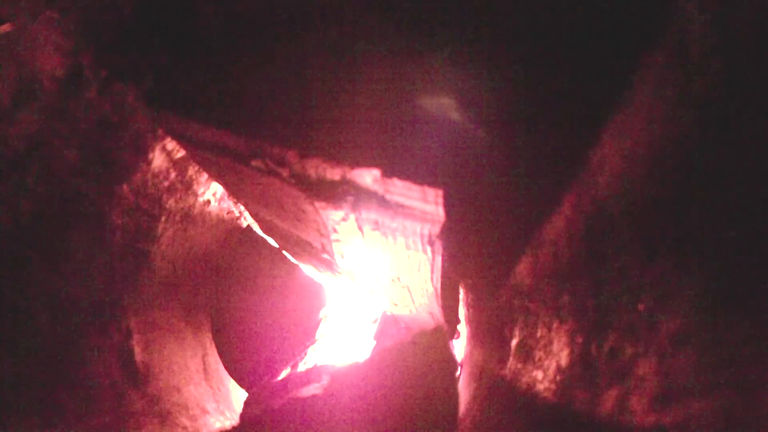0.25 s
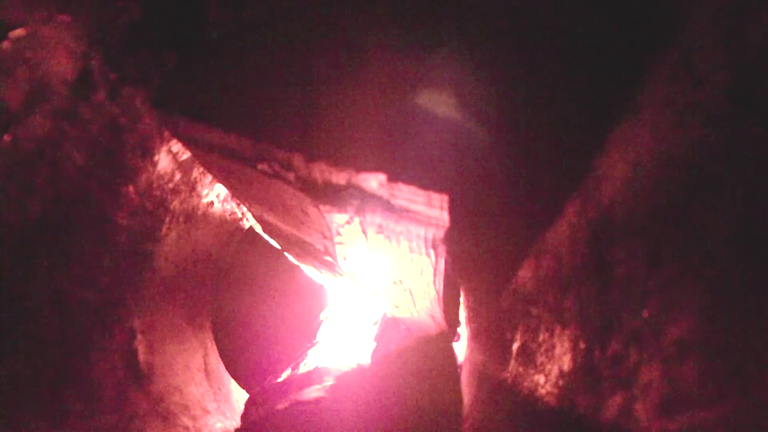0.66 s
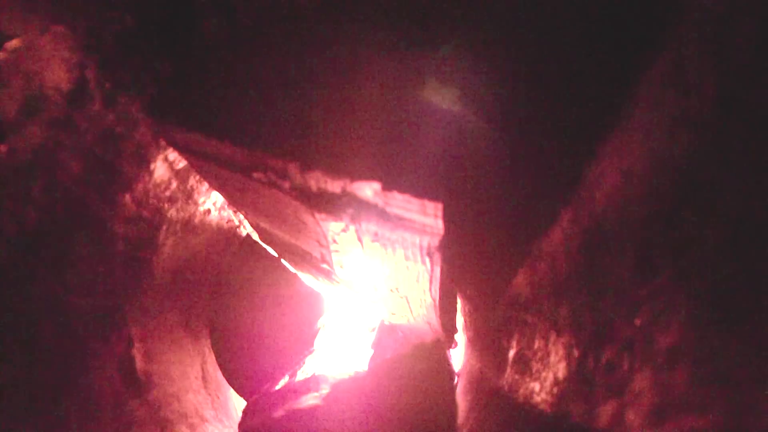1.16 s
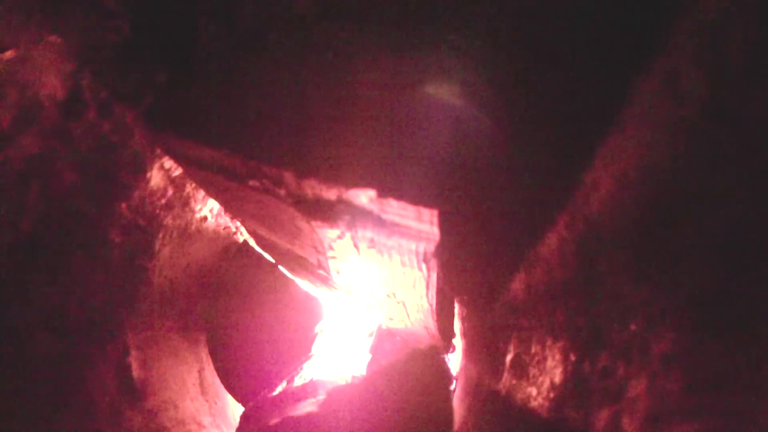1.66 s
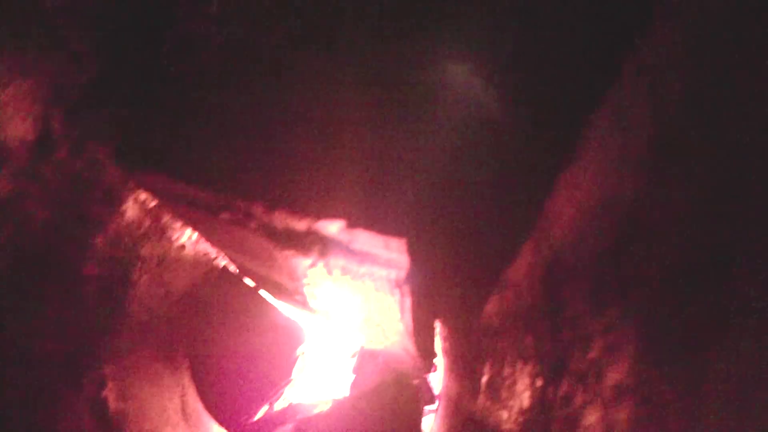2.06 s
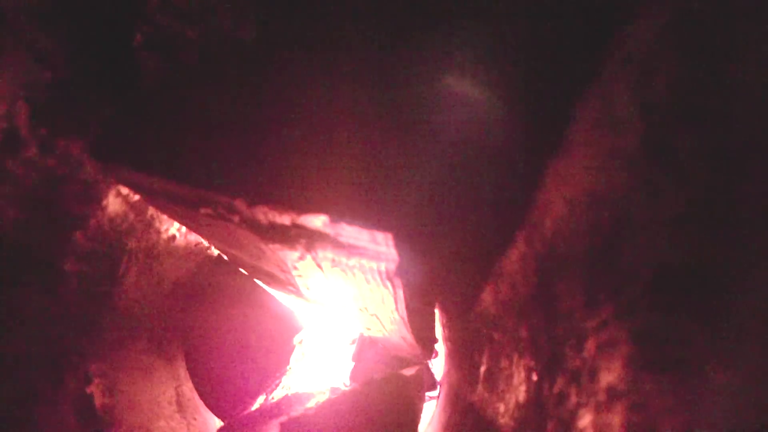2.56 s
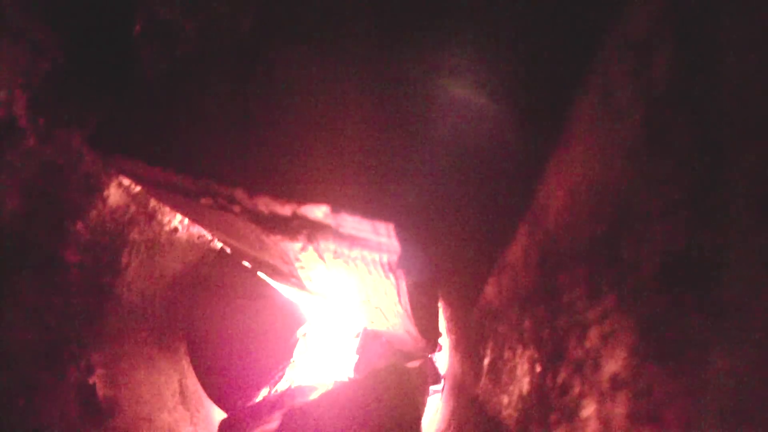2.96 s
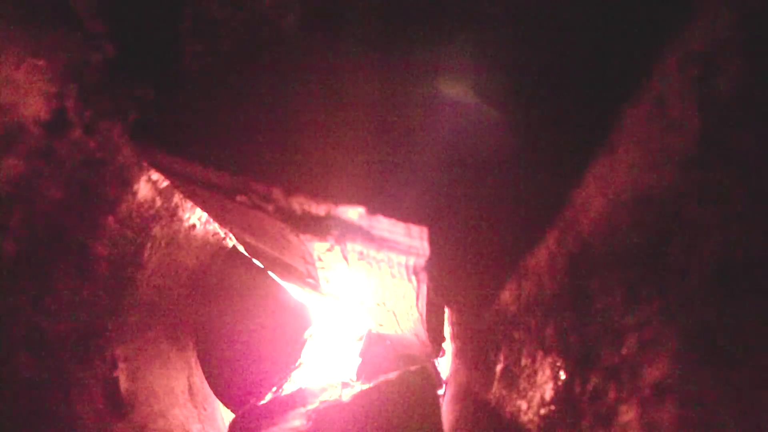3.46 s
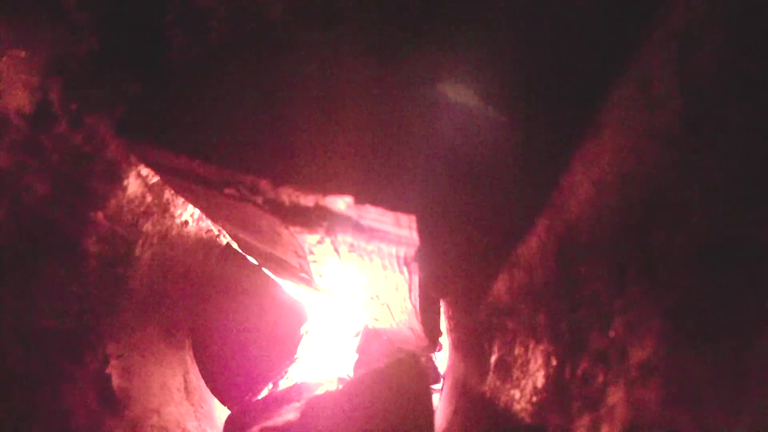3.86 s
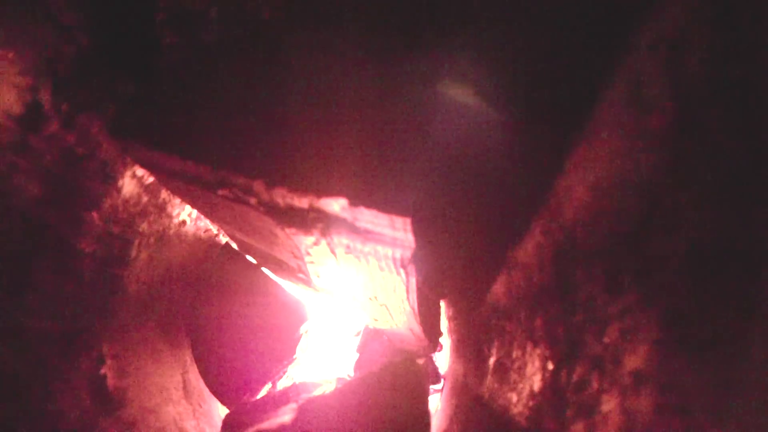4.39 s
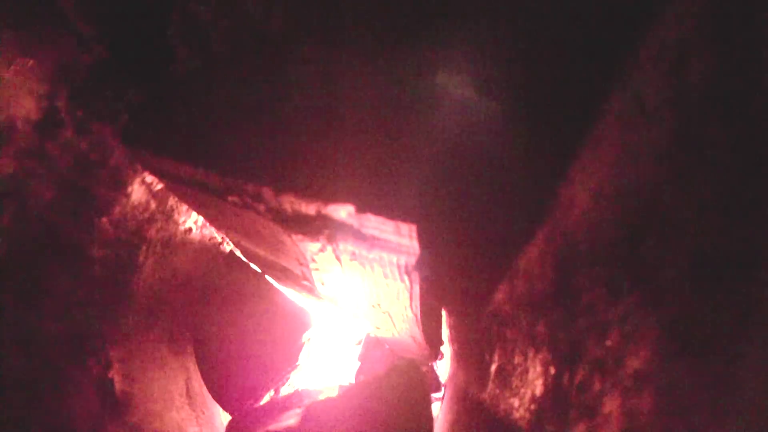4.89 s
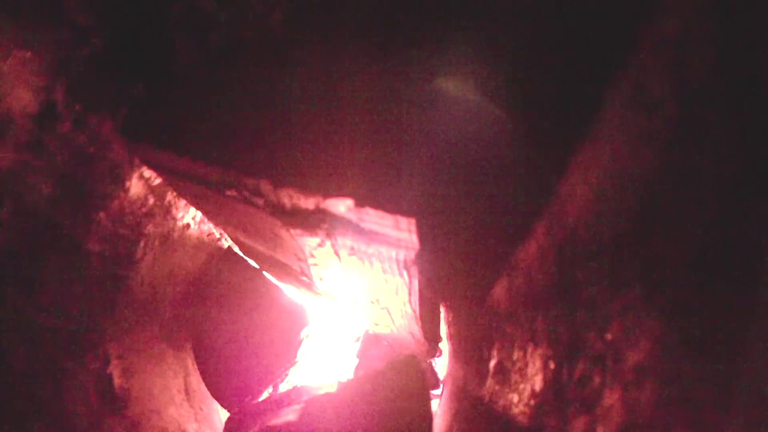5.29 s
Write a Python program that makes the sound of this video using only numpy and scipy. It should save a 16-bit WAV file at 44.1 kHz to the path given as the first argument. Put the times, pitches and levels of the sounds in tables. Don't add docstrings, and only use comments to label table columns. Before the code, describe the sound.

A wood boiler burns close to a small camera microphone in a basement. Throughout, two deep tones near 54 and 59 hertz beat about five times a second, with faint motor overtones, even low rumble and wide, bright fan hiss. The flame roars softly, fluttering in short hollow swells around 200 to 450 hertz, with brief higher flue notes, dull puffs and soft thuds. Thin ember ticks fall near 0.45 and 0.66 s. At 1.06 s the left dips for some hundredths of a second while the right blips, then goes mute. A tick at 1.43, a quick double crack at 1.75, ticks at 2.59 and 2.79. At 3.19 a join repeats earlier fire, with ticks at 3.99 and 4.19. At 4.59 the dip and blip recur; ticks return at 4.97, the crack at 5.28. Near 5.33 the right side opens with its own burning until the end.

```python
import sys
import numpy as np
from scipy import signal
from scipy.io import wavfile
from scipy.ndimage import uniform_filter1d

SR = 44100
rng = np.random.default_rng(int(sys.argv[2]) if len(sys.argv) > 2 else 0)


def wrap_up_sound(samples):
    columns = np.atleast_2d(samples).T
    tamed = np.clip(columns, -1, 1)
    steps = np.round(tamed * 32767).astype(np.int16)
    wavfile.write(sys.argv[1], SR, steps)


def natural_amplitude(level_db):
    exponent = np.asarray(level_db, float) / 20
    return 10 ** exponent


N = 243996

# f/Hz, level/dB per Hz
HISS_SPECTRUM = [(1800, -29), (2300, -12), (2800, -13), (3300, -2), (4450, -3.5), (4850, -7), (5250, -10),
                 (5550, -7), (6000, 0.5), (6600, -1.5), (7300, 0), (8600, -0.5), (9600, -0.5),
                 (10500, -0.5), (14000, 0), (15600, 2.5)]
# f/Hz, width/Hz, level/dB rms
HOUSING_PEAKS = [(2156, 60, -69), (3200, 180, -63), (4880, 200, -63.5), (5920, 450, -59.5)]
# f/Hz, width/Hz, level/dB
GRATE_MODES, GRATE_REST_DB = [(160.5, 31, -1.6), (192.3, 14, 0.64)], -47
# t/s, level/dB, hold/s
GRATE_FLARES = [(1.1, -41, .02), (1.27, -41, .04), (1.4, -44, .03), (1.46, -43, 0.088), (1.6, -42, .03),
                (1.69, -42, .03), (1.81, -41, .1), (1.96, -42, .04), (2.05, -44, .04), (2.13, -42.5, 0.058),
                (2.25, -42.5, .05), (2.33, -47, 0.049), (2.46, -42, 0.076), (2.59, -45, .03),
                (2.68, -44, 0.056), (2.84, -43, 0.04), (2.95, -43, .08), (3.1, -48, .05)]

# f/Hz, level/dB rms
HUM_TONES = [(53.67, -32.5), (59.12, -37.5)]
# f/Hz, level/dB rms
MOTOR_OVERTONES = [(161.3, -49), (537, -54), (603.8, -58), (965.6, -58.5), (1085.7, -61), (1206, -65),
                   (1825, -63), (1890, -66)]
# t/s, shaft level/dB, field level/dB, slip of the beat/turns
FAN_LOAD = [(1.06, 4.5, 9, .01), (1.2, 1.5, -1, .01), (1.35, 1, .1, .01), (1.5, 0.7, .1, .01),
            (1.65, -0.7, -0.5, .01), (1.8, 1.5, 0, .01), (1.9, -4.5, -4, .01), (2.05, -3.5, -1.5, .01),
            (2.2, 0.7, -4, .01), (2.35, 1.5, 3.5, .01), (2.5, -3.8, 1, .01), (2.65, 2, 1.5, .01),
            (2.8, -2.8, -0.5, .01), (2.9, 5, 5, 0.011), (3.05, -2.3, 2.5, .01), (3.2, -4.5, 3, .01)]

# t/s, peak level/dB, low f/Hz, t60/s
EMBER_TICKS = [
    (1.4328, -21.5, 7500, .009),
    (2.5874, -22, 10500, .007),
    (2.7918, -19, 10000, .005),
    (1.842, -29, 12500, .007),
    (2.7562, -29, 8800, .01),
    (2.8912, -26, 9500, .008),
    (3.103, -28, 11000, .008),
    (3.14, -31, 9000, .008),
    (1.428, -33, 9000, .005),
]
# t/s, peak level/dB, t60/s
EMBER_POPS = [
    (1.7434, -25, .006),
    (1.7449, -19.5, .01),
    (1.7548, -21.5, .014),
    (1.7572, -28, .012),
]
# t/s, peak level/dB, low f/Hz, high f/Hz, t60/s
EMBER_RINGS = [
    (1.7472, -32, 5400, 7500, .03),
    (1.7552, -34, 5500, 6800, .03),
    (1.7459, -43, 2800, 4200, .012),
    (1.7408, -33, 8500, 12000, .006),
    (2.5859, -25, 7700, 9200, .011),
    (2.5864, -27, 10500, 15300, .012),
    (2.7917, -39, 5300, 6800, .008),
    (3.14, -36, 4000, 8000, .008),
    (2.7928, -31, 10000, 15000, .006),
    (1.0899, -34, 8500, 13000, .008),
]
# t/s, peak level/dB, low f/Hz, high f/Hz
FLAME_PUFFS = [(1.858, -24, 346, 526), (1.891, -30, 500, 1900), (2.067, -30.5, 480, 1400),
               (2.488, -27.5, 410, 915), (2.531, -28.5, 586, 1340), (2.685, -27.5, 513, 1210),
               (2.71, -36, 405, 1520), (2.942, -30, 540, 840), (2.986, -28.5, 600, 1490),
               (3.172, -35, 477, 1190), (2.97, -30, 500, 1200), (1.743, -26.5, 423, 890),
               (1.413, -32, 500, 1000), (1.453, -31, 500, 1200), (1.55, -28, 500, 1000),
               (1.607, -23, 480, 900), (2.02, -40, 450, 790), (2.04, -33, 496, 900), (2.217, -38, 450, 890),
               (2.243, -27, 520, 1040), (2.562, -28, 407, 790), (2.636, -40, 474, 925),
               (2.767, -28.5, 500, 1010), (2.885, -37, 480, 804), (3.035, -34, 500, 890),
               (3.092, -28, 450, 1100), (3.17, -28, 400, 840), (1.084, -32, 500, 1800),
               (2.941, -37, 505, 1110)]

# f/Hz, level/dB per Hz
ROAR_SPECTRUM = [(260, -4), (310, 0), (350, -5), (400, -1), (520, -2), (750, -10.5), (1000, -10.5)]
# f/Hz, width/Hz, level/dB over the roar
FLUE_IN_ROAR = [(623, 60, -6), (817, 17, -11)]
# f/Hz, level/dB per Hz
UPPER_SPECTRUM = [(1000, -2), (1300, -1), (1700, -3.5), (2100, -8), (3000, -11.5)]
# f/Hz, width/Hz, level/dB over the upper roar
DUCT_MODE = (1827, 53, -8)
# t/s, level/dB
FAN_PULL = [
    (1.1, -43.5),
    (1.79, -42),
    (2.23, -44),
    (3.19, -43),
]
# f/Hz, level/dB per Hz
RUMBLE_SPECTRUM = [(15, 10), (22, -7), (30, -3), (45, -5.5), (60, -8.5), (72, -13.5), (92, -6), (135, -16),
                   (165, -13), (190, -6.5), (280, -13.5)]

# f/Hz, width/Hz, level/dB
LOW_MODES = [(219.3, 11.4, -3.5), (185, 30, -21.5)]
HIGH_MODES = [(432.8, 30, -5), (445.7, 24, -2.5)]
# f/Hz, width/Hz, level/dB
FLANK_MODES, FLANK_DB = [(414, 28, -1.5), (471, 28, 0.5)], -9.5
# f/Hz, width/Hz, level/dB
SIDE_MODES = [(252.8, 17.7, 0)]
# f/Hz, width/Hz, level/dB
LOW_FLUE, HIGH_FLUE = [(624, 60, 0)], [(821, 79, 0)]
# f/Hz, width/Hz, level/dB
ASH_PIT_MODES = [(90.4, 20, 0)]
# t/s, level/dB, hold/s
LOW_MODE_FLARES = [(1.19, -46, 0.056), (1.255, -38, 0.11), (1.387, -36, 0.023), (1.47, -32, 0.037),
                   (1.566, -40.5, 0.012), (1.664, -30, 0.059), (1.75, -44, 0.077), (1.82, -42, 0.13),
                   (2.02, -34.5, 0.13), (2.347, -33.5, 0.01), (2.434, -32, 0.015), (2.5, -30.5, 0.095),
                   (2.64, -34, 0.095), (2.943, -35, 0.013), (3.02, -35, 0.013), (3.077, -34, 0.042)]
HIGH_MODE_FLARES = [(1.052, -31, 0.021), (1.19, -42, 0.0079), (1.36, -51, 0.0088), (1.78, -44.5, 0.0073),
                    (2.3, -47, 0.022), (2.735, -44, 0.017), (1.09, -45, 0.14), (1.33, -40, 0.059),
                    (1.43, -47, 0.13), (1.66, -36, 0.014), (1.825, -37.5, 0.057), (2.0, -36, 0.032),
                    (2.195, -39, 0.12), (2.48, -33, 0.025), (2.545, -36, 0.0045), (2.69, -39, 0.059),
                    (2.8, -39, 0.0095), (2.87, -35, 0.11), (3.065, -37.5, 0.036), (3.155, -39, 0.026)]
SIDE_CAVITY_FLARES = [(1.052, -31.5, 0.021), (1.088, -41.5, 0.085), (1.22, -35, 0.03), (1.31, -28, 0.011),
                      (1.4, -39, 0.023), (1.6, -38, 0.016), (1.842, -30, 0.024), (2.025, -39, 0.11),
                      (2.153, -37, 0.0059), (2.5, -68, 0.033), (2.632, -40, 0.022), (2.704, -33, 0.014),
                      (2.816, -46, 0.031), (2.93, -31, 0.0087), (3.003, -38, 0.023), (3.08, -37.5, 0.13)]
# t/s, level/dB, hold/s
LOW_FLUE_GUSTS = [
    (1.418, -44.5, 0.021),
    (1.823, -37, 0.027),
    (2.043, -45, 0.022),
    (2.703, -35.5, 0.022),
    (2.901, -34.5, 0.016),
    (2.942, -36, 0.039),
]
HIGH_FLUE_GUSTS = [
    (1.125, -50, 0.037),
    (1.814, -48, 0.068),
    (2.017, -51, 0.051),
    (2.107, -40, 0.0088),
    (2.215, -45.5, 0.052),
    (2.522, -41.5, 0.012),
    (2.678, -43, 0.031),
    (2.923, -48, 0.058),
    (3.125, -54, 0.054),
]
# t/s, level/dB, hold/s
ASH_PIT_THUDS = [
    (1.262, -46, 0.071),
    (1.513, -40, 0.055),
    (1.863, -38, 0.11),
    (2.297, -41, 0.21),
    (2.94, -53, 0.03),
]

STORED_STRETCH = (46640, 140814)
LEFT_REPLAY = [
    (0, -94175),
    (46640, 0),
    (140814, 61802),
    (202615, 155975),
]
RIGHT_RESTART = (234987, 188347)
# t after start/s, left level/dB, right level/dB
SIDES_WAKE = [
    (0, -21, -12),
    (.01, -19, -12),
    (.017, -13, -11),
    (.024, -7, -14),
    (.031, -2, -22),
    (.036, 0, -38),
    (.05, 0, -70),
]


def rms_one(x):
    return x / np.sqrt(np.mean(x ** 2) + 1e-20)


def at_hz(points, hz):
    f, level = np.transpose(points)
    return np.interp(np.log(hz), np.log(f), level)


def drift(rate):
    r = np.exp(-80 * np.pi * rate / SR)
    slow = signal.lfilter([1], [1, -2 * r, r * r], rng.standard_normal(N // 40 + 2002))[2000:]
    return np.interp(np.arange(N) / 40, np.arange(len(slow)), rms_one(slow))


def resonate(x, hz, width_hz):
    r = np.exp(-np.pi * width_hz / SR)
    poles = [1, -2 * r * np.cos(2 * np.pi * hz / SR), r * r]
    return signal.lfilter([(1 - r * r) / 2, 0, (r * r - 1) / 2], poles, x)


def ringing_air(hz, width_hz, level_db):
    return natural_amplitude(level_db) * rms_one(resonate(rng.standard_normal(N), hz, width_hz))


def ringing_cavity(hz, width_hz, level_db):
    once = resonate(rng.standard_normal(N), hz, width_hz)
    return natural_amplitude(level_db) * rms_one(resonate(once, hz, width_hz))


def even_out(x, window, power, steady):
    swell = uniform_filter1d(uniform_filter1d(x ** 2, size=window), size=window) / power
    return x / (swell + 1e-3) ** (steady / 2)


def banded_noise(spectrum, patchy_db, rate, steady=0):
    lowest, highest = spectrum[0][0], spectrum[-1][0]
    edges = np.geomspace(lowest, highest, round(4 * np.log2(highest / lowest)) + 1)
    out, together, white = 0, drift(rate), rng.standard_normal((2, N))
    for k, (low, high) in enumerate(zip(edges, edges[1:])):
        band_pass = signal.butter(2, [low, high], "band", fs=SR, output="sos")
        band = signal.sosfilt(band_pass, white[k % 2])
        band = even_out(band, 1500, np.mean(band ** 2), steady)
        flicker_db = patchy_db * (together + 0.79 * drift(rate))
        out = out + band * natural_amplitude(at_hz(spectrum, np.sqrt(low * high)) + flicker_db)
    return rms_one(out)


def flaring(flares, rest_db):
    rise_s, fall_s = 0.0055, 0.012
    start, db, hold = np.array(flares).T[:, :, None]
    since = np.arange(N) / SR - start
    rise = np.clip(since / rise_s, 0, 1)
    fall = np.exp(-np.maximum(since - rise_s - hold, 0) / fall_s)
    return 20 * np.log10(natural_amplitude(rest_db) + np.sum(natural_amplitude(db) * rise * fall, axis=0))


def singing(modes, level_db, steady):
    tone = sum(ringing_cavity(*mode) for mode in modes)
    return natural_amplitude(level_db) * rms_one(even_out(tone, 1100, 1, steady))


def fan_hiss():
    return natural_amplitude(-42.5) * banded_noise(HISS_SPECTRUM, patchy_db=0.46, rate=5.2)


def housing():
    peaks = sum(ringing_cavity(*peak) for peak in HOUSING_PEAKS)
    return peaks + singing(GRATE_MODES, flaring(GRATE_FLARES, GRATE_REST_DB), steady=0.93)


def noise_burst(db, low_hz, high_hz, t60_s, snap):
    t = np.arange(3000) / SR
    band = signal.butter(3, [low_hz, high_hz], "band", fs=SR, output="sos")
    decay = natural_amplitude(-60 * t / t60_s) * np.minimum(t / .0004, 1)
    tail = signal.sosfilt(band, rng.standard_normal(len(t)) * decay)
    click = signal.sosfilt(band, (t == 0).astype(float))
    burst = (1 - snap) * tail / np.abs(tail).max() + snap * click / np.abs(click).max()
    return natural_amplitude(db) * burst / np.abs(burst).max()


def place(bursts):
    out = np.zeros(N)
    for s, *settings in bursts:
        burst = noise_burst(*settings)
        out[round(s * SR):][:len(burst)] += burst
    return out


def embers():
    ticks = [(s, db, low_hz, 15500, t60, 0.5) for s, db, low_hz, t60 in EMBER_TICKS]
    pops = [(s, db, 5300, 10600, t60, 0.6) for s, db, t60 in EMBER_POPS]
    rings = [(*ring, 0) for ring in EMBER_RINGS]
    bodies = [(s, db - 6.5, 700, 2630, 0.028, 0.6) for s, db, _ in EMBER_POPS[:2]]
    return place(ticks + pops + rings + bodies)


def puffs():
    cycles = 17
    return place([(s, db, low, high, cycles / high, 0.62) for s, db, low, high in FLAME_PUFFS])


def motor():
    null_s = 1.997
    now = np.arange(N) / SR
    t = now - null_s
    load_s, *columns = np.transpose(FAN_LOAD)
    *load_db, slip = (np.interp(now, load_s, column) for column in columns)
    out = np.zeros(N)
    for k, (hz, db) in enumerate(HUM_TONES):
        level = natural_amplitude(db + 5.5 + load_db[k] + 0.25 * drift(11.0))
        out += level * (-1) ** k * np.sin(2 * np.pi * (hz * t + k * slip))
    for hz, db in MOTOR_OVERTONES:
        level = np.sqrt(2) * natural_amplitude(db + 2.5 * drift(4))
        turns = hz * t + rng.random() + .08 * drift(3)
        out += level * np.sin(2 * np.pi * turns)
    return out


def flame(swing_db):
    roar = natural_amplitude(4.5) * banded_noise(ROAR_SPECTRUM, patchy_db=1.33, rate=2.4)
    roar += sum(ringing_air(*mode) for mode in FLUE_IN_ROAR)
    upper = banded_noise(UPPER_SPECTRUM, patchy_db=0.83, rate=28) + ringing_air(*DUCT_MODE)
    rumble = natural_amplitude(-33.5) * banded_noise(RUMBLE_SPECTRUM, patchy_db=-1.7, rate=116, steady=0.69)
    pull_db = np.interp(np.arange(N) / SR, *np.transpose(FAN_PULL))
    return natural_amplitude(-43.5 + 0.22 * swing_db) * roar + natural_amplitude(pull_db - 3.5 + 0.06 * swing_db) * upper + rumble


def flanks(high_db):
    return singing(FLANK_MODES, high_db + FLANK_DB, steady=0.33)


def firebox(high_db):
    box = singing(LOW_MODES, flaring(LOW_MODE_FLARES, -43.5) + 1.0, steady=0.59)
    box += singing(HIGH_MODES, high_db + 0.5, steady=1.0)
    box += singing(SIDE_MODES, flaring(SIDE_CAVITY_FLARES, -42) - 1.5, steady=0.95)
    for modes, gusts in ((LOW_FLUE, LOW_FLUE_GUSTS), (HIGH_FLUE, HIGH_FLUE_GUSTS),
                         (ASH_PIT_MODES, ASH_PIT_THUDS)):
        box += singing(modes, flaring(gusts, -53.5) - 2.0, steady=0.7)
    return box


def scene():
    high_db = flaring(HIGH_MODE_FLARES, -43)
    swing_db = high_db - high_db[slice(*STORED_STRETCH)].mean()
    mix = firebox(high_db) + fan_hiss() + motor() + flame(swing_db)
    mix += housing() + embers() + puffs() + flanks(high_db)
    return natural_amplitude(4.5) * np.tile(mix, (2, 1))


def microphone(x):
    x = signal.sosfilt(signal.cheby2(2, 20, (7680, 7940), "stop", fs=SR, output="sos"), x)
    return signal.sosfilt(signal.ellip(10, .5, 55, 15270, fs=SR, output="sos"), x)


def wake(x):
    s, left_db, right_db = np.transpose(SIDES_WAKE)
    since = (np.arange(N) - STORED_STRETCH[0]) / SR
    left = x * natural_amplitude(np.interp(since, s, left_db))
    right = x * natural_amplitude(np.interp(since, s, right_db))
    bass = signal.sosfilt(signal.butter(2, 150, fs=SR, output="sos"), x)
    left += natural_amplitude(-14) * bass * np.clip(1 - since / s[-2], 0, 1)
    right += natural_amplitude(-26) * np.exp(-np.abs(since) / .0005)
    right[since > s[-1]] = 0
    return left, right


def replay(left, right):
    now = np.arange(N)
    starts, backs = np.transpose(LEFT_REPLAY)
    read = now - backs[np.searchsorted(starts, now, "right") - 1]
    out = np.array([left[read], right[read]])
    for step in starts[1:]:
        jump = out[0, step] - out[0, step - 1]
        out[0, step - 150:step] += jump * np.linspace(0, .85, 150)
    start, back = RIGHT_RESTART
    late = now[start:]
    out[1, late] = natural_amplitude(-0.5) * (left + right)[late - back]
    return out


def low_pass(x):
    return signal.sosfilt(signal.butter(12, 16510, fs=SR, output="sos"), x)


def record(dry):
    left, right = wake(microphone(dry[0]))
    mix = replay(left, right)
    return low_pass(mix)


dry = scene()
out = record(dry)
wrap_up_sound(out)
```